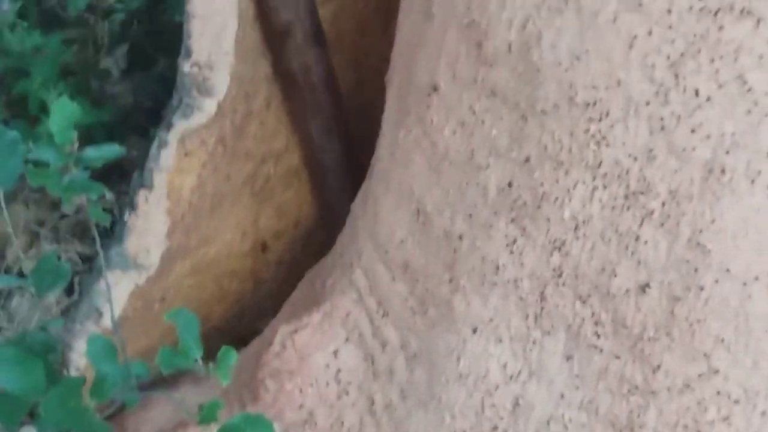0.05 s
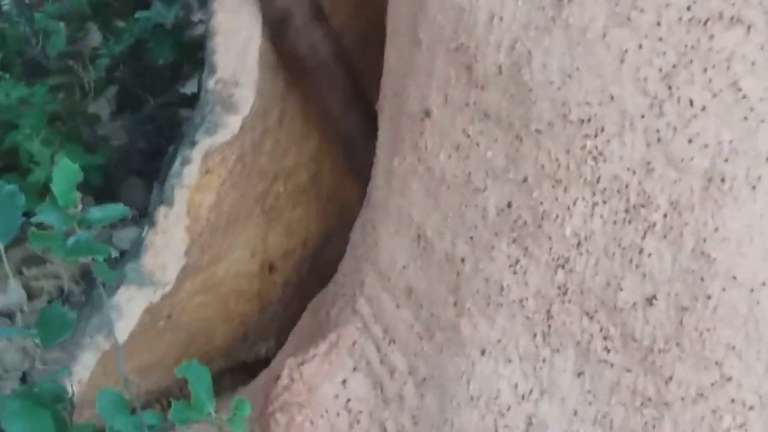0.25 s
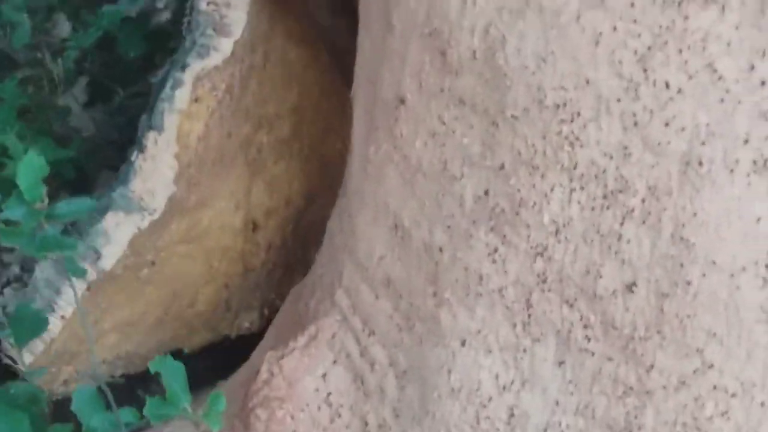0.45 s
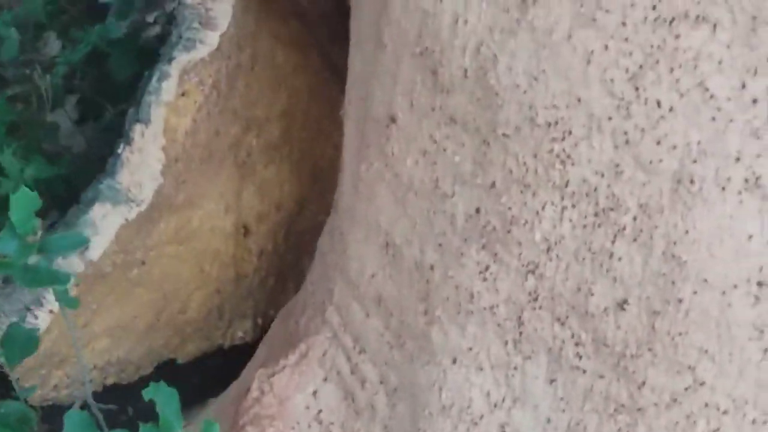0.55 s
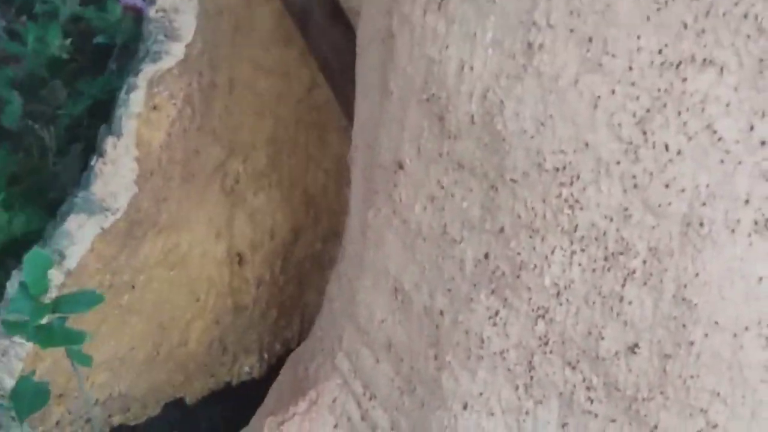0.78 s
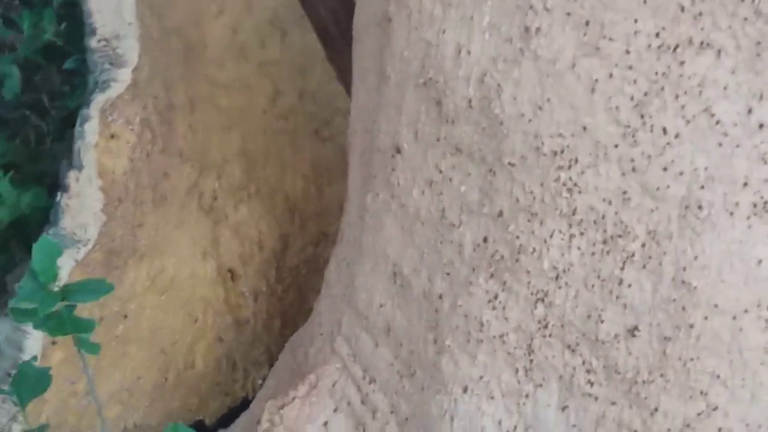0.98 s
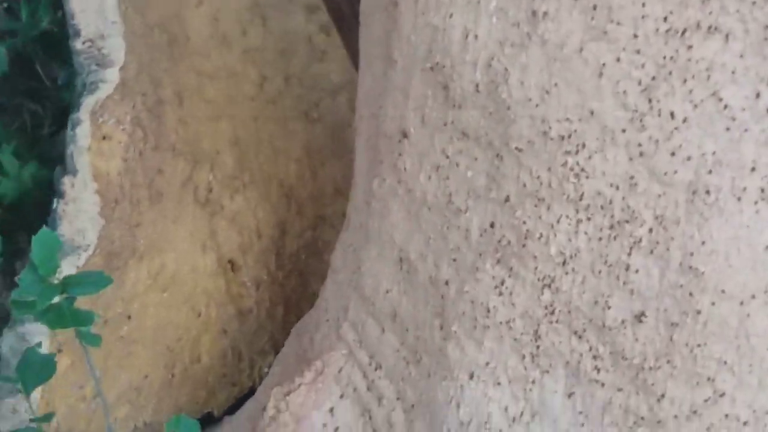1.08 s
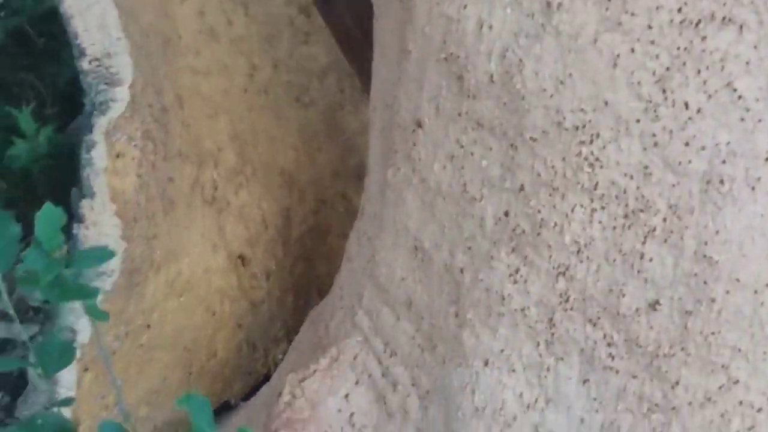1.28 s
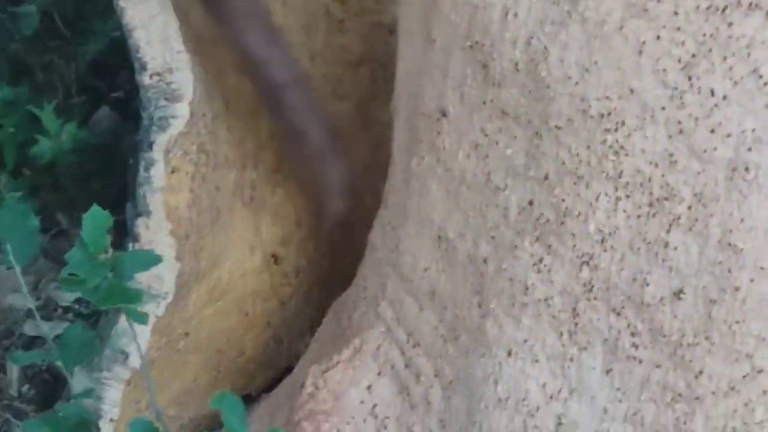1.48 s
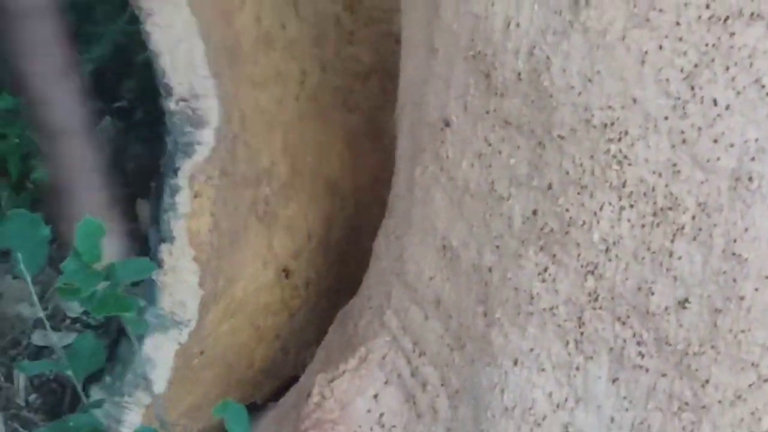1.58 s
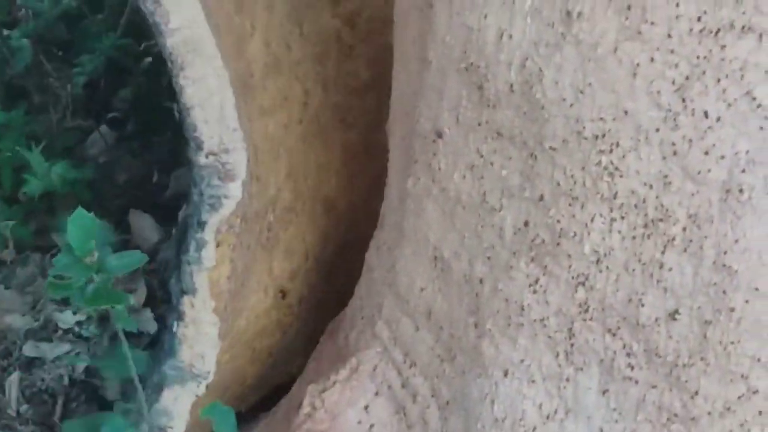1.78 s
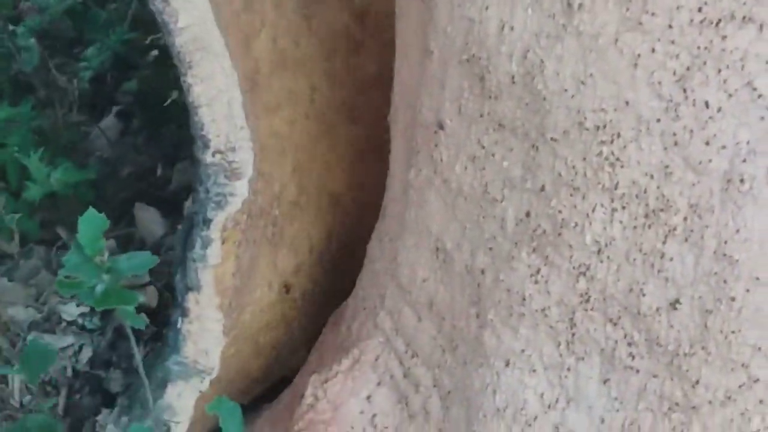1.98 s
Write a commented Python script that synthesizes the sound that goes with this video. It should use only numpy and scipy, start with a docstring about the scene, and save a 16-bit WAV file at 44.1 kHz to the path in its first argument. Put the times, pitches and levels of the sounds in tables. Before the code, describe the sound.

A slab of bark splits from a tree with a hollow thump and a sharp crack as a wooden pole scrapes and knocks behind it. Crunches, snapping fibres and soft thuds follow, close to the microphone in quiet open air.

```python
"""A thick slab of cork bark is levered off its trunk with a wooden pole, outdoors and close by.
From the start the pole scrapes along the gritty inner face, and soon the first fibres snap.
At a quarter second the slab lets go with a hollow thump and a sharp crack; the pole knocks against it.
Then it peels away in dull thuds, crunch and small snaps, with one more, softer knock.
Near the end a far bird chirps twice."""
import sys
import numpy as np
from scipy import signal
from scipy.fft import rfft, irfft, next_fast_len
from scipy.io import wavfile
from scipy.ndimage import map_coordinates

SR = 44100
rng = np.random.default_rng(int(sys.argv[2]) if len(sys.argv) > 2 else 0)


def dump_mix(stems):
    """Bounce the given channels to the path in sys.argv[1] as a 16-bit WAV at rate SR."""
    frames = np.atleast_2d(stems).T  # one column per channel
    limited = np.clip(frames, -1, 1)  # hard clip at full scale
    pcm = np.round(limited * 32767).astype(np.int16)
    wavfile.write(sys.argv[1], SR, pcm)


N = 90404
TIME = np.arange(N) / SR


def amp(db):
    """Decibels to gain."""
    return 10 ** (np.asarray(db) / 20)


def unit(x):
    """Scale to rms 1."""
    return x / np.sqrt(np.mean(x ** 2) + 1e-20)


def along(points, hz):
    """Read (frequency, value) points on a log frequency axis."""
    frequencies, values = np.transpose(points)
    return np.interp(np.log(hz + 1), np.log(frequencies + 1), values)


def curve(points):
    """Join (time, value) points into one value per sample."""
    return np.interp(TIME, *np.transpose(points))


def filtered(x, response):
    """Filter x by a complex response of frequency."""
    size = next_fast_len(N + SR // 2)
    return irfft(rfft(x, size) * response(np.fft.rfftfreq(size, 1 / SR)), size)[:N]


def coloured(x, spectrum):
    """Shape x with an EQ curve, at rms 1."""
    return unit(filtered(x, lambda hz: amp(along(spectrum, hz))))


def resonate(x, peaks, sign=-1, order=1):
    """A resonator bank: the sign between neighbours shapes the valleys, order steepens the skirts."""
    def response(f):
        return sum(sign ** k * amp(db) * (1j * f * width / (hz * hz - f * f + 1j * f * width)) ** order
                   for k, (hz, width, db) in enumerate(peaks))
    return filtered(x, response)


def ring(modes, start, attack_s):
    """Damped modes struck at the start time."""
    t = np.maximum(TIME - start, 0)
    tone = sum(amp(db - 60 * t / t60) * np.sin(2 * np.pi * hz * t) for hz, db, t60 in modes)
    return tone * (1 - np.exp(-(t / attack_s) ** 2))


def grains(per_s, spread_db=5.5):
    """Random tiny impulses of very unequal size, at rms 1."""
    impulses = (rng.random(N) < per_s / SR) * rng.choice([-1, 1], N)
    return unit(impulses * amp(spread_db * np.clip(rng.standard_normal(N), -2, 2)))


def fracture(start, t60, peaks, sign=-1, order=1):
    """One break sets off a spray of tiny ones; together they ring the given resonances."""
    t = np.maximum(TIME - start, 0)
    rise_s = 0.098 * t60
    spray = rng.standard_normal(N) * (1 - np.exp(-t / rise_s)) * amp(-60 * t / t60)
    first_break = amp(-1.5) * np.diff((t > 0).astype(float), prepend=0)
    burst = resonate(first_break + spray / np.linalg.norm(spray), peaks, sign, order)
    return unit(burst) * np.sqrt(0.004 * SR / N)  # the energy of 4 ms at rms 1


# EQ of the outdoor bed (frequency [Hz], gain [dB])
AIR_EQ = [(100, 4.5), (550, 9.5), (1500, 1), (3900, -8.5), (9000, -22.5), (16000, -18)]
def air():
    """A quiet, steady bed of open air."""
    return amp(-59) * coloured(rng.standard_normal(N), AIR_EQ)


# fader ride of the scraping pole (time [s], level [dB])
SCRAPE_RIDE = [(0, -37), (.085, -34), (.15, -46.5), (.23, -48.5), (.265, -33.5), (.31, -44.5), (.46, -44.5),
               (.49, -36.5), (.54, -35), (.56, -41.5), (.65, -49.5), (.70, -45), (.93, -49), (1.03, -37),
               (1.11, -39.5), (1.22, -45.5), (1.32, -43.5), (1.42, -45.5), (1.52, -54.5), (1.62, -55),
               (1.68, -49.5), (1.77, -50.5), (2.05, -52.5)]
# EQ of the scrape: broad, with several peaks and a dip near 8 kHz (frequency [Hz], gain [dB])
SCRAPE_EQ = [(100, 1), (300, -4.5), (550, -1.5), (1000, -1), (1600, 2), (2250, -8.5), (2900, -4.5),
             (3600, 1.5), (4500, -1), (5250, -12), (6400, -1), (7300, -11.5), (8200, -16), (10200, -4),
             (12000, -10), (16000, -7)]
def scrape(grit_share=0.46, judder_db=1.5, judder_per_s=76):
    """The pole drags along the inner face: dense grit on a rubbing hiss, with a slight judder."""
    grit = np.sqrt(grit_share) * grains(per_s=2200)
    hiss = np.sqrt(1 - grit_share) * rng.standard_normal(N)
    judder = map_coordinates(rng.standard_normal(4096), [TIME * judder_per_s], mode="wrap")
    return amp(curve(SCRAPE_RIDE) + judder_db * judder) * coloured(grit + hiss, SCRAPE_EQ)


# fader ride of the bending slab (time [s], level [dB])
RUMBLE_RIDE = [(0, -75), (.22, -49), (.32, -33.5), (.45, -48), (.50, -30), (.57, -45), (.67, -33),
               (.72, -51.5), (.92, -46.5), (.96, -35.5), (1.12, -46), (1.38, -63), (1.56, -42.5),
               (1.68, -40), (1.74, -56), (1.81, -36.5), (1.93, -42), (2.05, -34)]
# its bass-heavy EQ (frequency [Hz], gain [dB])
RUMBLE_EQ = [(25, -33), (45, -17), (75, 5), (110, -1), (160, -3.5), (230, -8.5), (2000, -88)]
def rumble():
    """Low end of the slab shuddering as it bends."""
    return amp(curve(RUMBLE_RIDE)) * coloured(rng.standard_normal(N), RUMBLE_EQ)


# fibre cues (time [s], tick level [dB], tick pitch [Hz], snap level [dB], fizz level [dB], t60 [s])
SNAP_CUES = [(0.179, -42.5, 930, -54, -40, .015), (0.2211, -35, 1400, -38, -41.5, 0.0059),
             (0.2695, -37, 1100, -42, -35.5, 0.002), (0.4338, -32, 850, -39.5, -46, 0.016),
             (.448, -38.5, 890, -53, -56, 0.0073), (0.4953, -26.5, 990, -43, -59, 0.072),
             (.5772, -29.5, 840, -52, -62, 0.002), (0.5913, -48, 1000, -37, -60, 0.0021),
             (.5993, -34, 635, -47, -52, 0.0075), (0.6087, -34, 1240, -38, -53, 0.0079),
             (.695, -34.5, 1030, -38, -53, 0.019), (0.7544, -32.5, 1160, -29.5, -64, 0.0029),
             (.857, -38.5, 990, -42, -56, 0.026), (0.8655, -33.5, 1190, -35, -39.5, 0.023),
             (1.401, -37.5, 1110, -40.5, -44, .018), (1.4157, -38, 1090, -48, -46, .012),
             (1.4676, -40.5, 810, -45, -55, 0.011), (1.712, -65, 1200, -55, -46, .0046),
             (1.732, -58, 1200, -44.5, -42, .045), (2.0183, -45.5, 1340, -42, -46, 0.0034)]
# resonances that give a snap its bite (frequency [Hz], width [Hz], gain [dB])
SNAP_PEAKS = [(3380, 640, 0), (3974, 1300, 2), (6300, 280, -8)]
# resonances of the fizz on top (frequency [Hz], width [Hz], gain [dB])
FIZZ_PEAKS = [(9770, 1340, -0.5), (14200, 2800, -4)]
def snaps(tick_width_hz=790):
    """Small fibres give way: each is a woody tick, quickly damped by the cork, plus snap and fizz."""
    out = np.zeros(N)
    for start, tick_db, tick_hz, snap_db, fizz_db, t60 in SNAP_CUES:
        tick_peaks = [(tick_hz, tick_width_hz, 0)]
        for db, peaks in (tick_db, tick_peaks), (snap_db, SNAP_PEAKS), (fizz_db, FIZZ_PEAKS):
            out += amp(db) * fracture(start, t60, peaks, order=2)
    return out


# reverb decay among the trees (frequency [Hz], t60 [s])
GROVE_DECAY = [(200, 0.11), (1500, 0.17), (5000, 0.11), (14000, 0.022)]
def grove(x):
    """A short reverb tail, scattered from the ground and nearby trunks."""
    hz, t, noise = signal.stft(rng.standard_normal(SR // 2), SR, nperseg=256)
    decay = amp(-60 * t / along(GROVE_DECAY, hz)[:, None])
    _, tail = signal.istft(noise * decay, SR, nperseg=256)
    return signal.fftconvolve(x, tail / np.linalg.norm(tail))[:N]


# fader ride of the tearing crunch (time [s], level [dB])
TEAR_RIDE = [(.23, -76), (.27, -37), (.38, -51), (.43, -44), (.51, -50), (.68, -47), (.75, -56.5),
             (.81, -46), (.96, -67)]
# woody resonances of the cork (frequency [Hz], width [Hz], gain [dB])
CORK_PEAKS = [(335, 280, 2.5), (596, 144, 2.5), (890, 174, -3.5)]
def tear():
    """Inner fibres let go one by one and crunch through the cork."""
    return amp(curve(TEAR_RIDE)) * unit(resonate(grains(per_s=350), CORK_PEAKS))


# cues for the springing slab (time [s], gain [dB])
JOLT_CUES = [(0.2362, 1.7), (.289, -25), (0.855, -27), (.901, -30)]
# hollow body of the slab (frequency [Hz], level [dB], t60 [s])
SLAB_MODES = [(144.3, -20, 0.16), (338, -8.5, 0.048), (384.7, 12.5, 0.02), (474.3, 5, 0.029)]
def jolts():
    """The slab springs loose, sucking air into the gap with one hollow thump, and later shifts softly."""
    return -sum(amp(db) * ring(SLAB_MODES, start, attack_s=0.0037) for start, db in JOLT_CUES)


# the main crack, in three quick stages (time [s], level [dB], t60 [s])
CRACK_CUES = [(.2499, -18.5, 0.0065), (0.2519, -19, 0.014), (0.2571, -24, 0.023)]
# resonances of the splitting slab (frequency [Hz], width [Hz], gain [dB])
SPLIT_PEAKS = [(803, 85, 8), (1090, 240, -3.5), (1770, 270, -1.5), (2750, 110, 7), (3120, 110, 9.5),
               (3940, 260, 3.5), (4330, 75, 6.5), (8960, 1000, -4.5), (12800, 5100, -14)]
def crack():
    """The bark splits from the trunk, a sharp edge just after the thump."""
    return sum(amp(db) * fracture(start, t60, SPLIT_PEAKS, sign=0.9) for start, db, t60 in CRACK_CUES)


# cues for the pole's knocks (time [s], gain [dB], low-pass corner [Hz])
KNOCK_CUES = [(0.3012, -26, 2940), (1.4676, -38, 900)]
# ring of the wooden pole (frequency [Hz], level [dB], t60 [s])
POLE_MODES = [(383.5, -3.5, 0.1), (519, -7, 0.14), (700, 12.5, 0.01), (875, -3, 0.12), (1130, 6, 0.018),
              (1550, 3.5, 0.057), (1597, 1.5, 0.046), (2000, -18, 0.092)]
def knocks():
    """The pole bumps in the gap; a softer contact rings mainly its low modes."""
    out = np.zeros(N)
    for start, db, corner_hz in KNOCK_CUES:
        wood = ring(POLE_MODES, start, attack_s=0.00023)
        out += amp(db) * filtered(wood, lambda hz: 1 / (1 + 1j * hz / corner_hz) ** 2)
    return out


# cues for the flexing slab (peak time [s], level [dB], pitch [Hz])
THUD_CUES = [(0.336, -25.5, 104), (0.482, -28.5, 150), (.501, -21, 120), (.618, -40, 142),
             (0.645, -24.5, 104), (0.805, -21, 96), (0.95, -26.5, 105), (1.122, -29.5, 102),
             (1.223, -34.5, 95), (1.648, -26.5, 120), (1.784, -21, 136), (1.899, -23.5, 109),
             (1.992, -26, 114)]
def thuds(half_length_s=0.0071, sag=0.18):
    """The heavy slab gives in soft jerks of two or three cycles, sagging in pitch."""
    out = np.zeros(N)
    for peak, db, hz in THUD_CUES:
        offset = (TIME - peak) / half_length_s
        cycles = hz * half_length_s * (offset - sag * offset ** 2 / 2)
        out += amp(db) * np.exp(-offset ** 2) * np.sin(2 * np.pi * cycles)
    return out


# cues for the faint chirps (peak time [s], level [dB])
CHIRP_CUES = [(1.851, -49.5), (2.025, -49.5)]
def bird(pitch_hz=3910, fall_hz_per_s=4300, half_length_s=0.012):
    """A far bird gives short, slightly falling whistles."""
    out = np.zeros(N)
    for peak, db in CHIRP_CUES:
        t = TIME - peak
        cycles = t * (pitch_hz - fall_hz_per_s * t / 2)
        out += amp(db) * np.exp(-(t / half_length_s) ** 2) * np.sin(2 * np.pi * cycles)
    return out


def scene():
    """The mix: bark and pole in open air, with only the hits sent to the reverb."""
    hits = jolts() + crack() + knocks() + snaps()
    ambience = air() + bird()
    reverb = amp(-15) * grove(hits)
    peeling = tear() + thuds() + rumble() + scrape()
    return (hits + reverb + peeling + ambience)[None]


def record(dry, low_cut_hz=40, high_cut_hz=15900):
    """Master EQ: a low cut for the deepest bass and a brick-wall high cut."""
    low_cut = signal.butter(3, low_cut_hz, "highpass", fs=SR, output="sos")
    trimmed = signal.sosfilt(low_cut, dry[0])
    return filtered(trimmed, lambda hz: 1 / np.sqrt(1 + (hz / high_cut_hz) ** 200))[None]


dry = scene()
out = record(dry)
dump_mix(out)
```